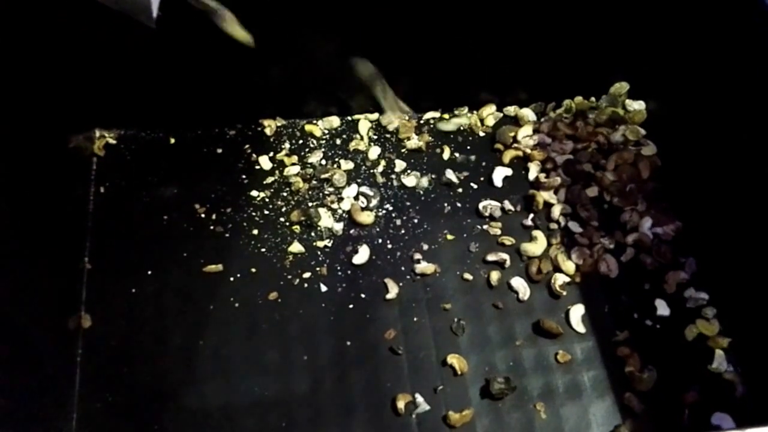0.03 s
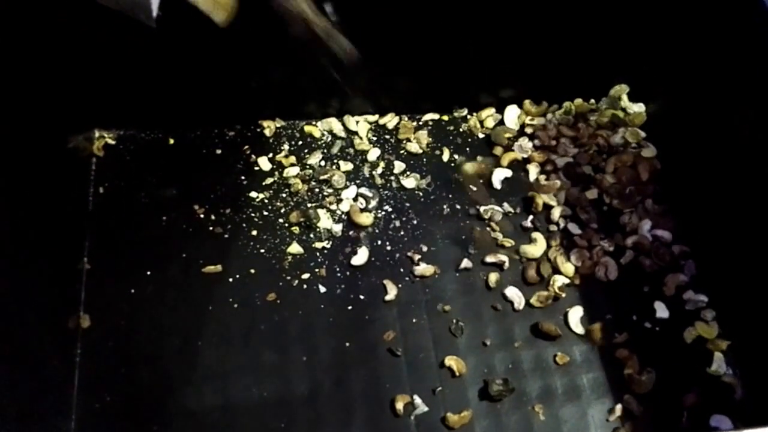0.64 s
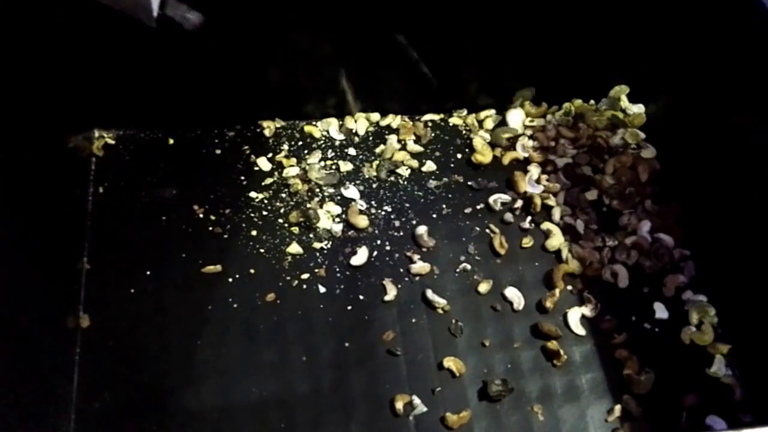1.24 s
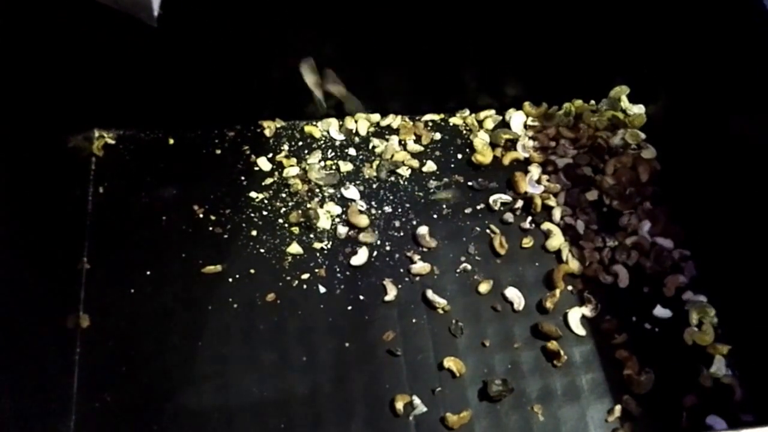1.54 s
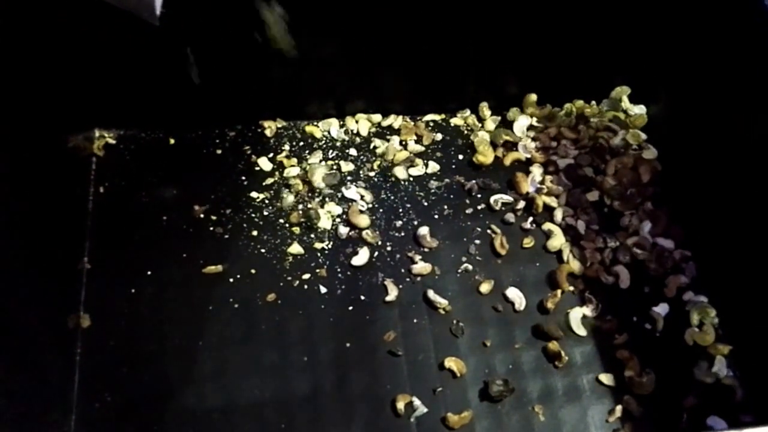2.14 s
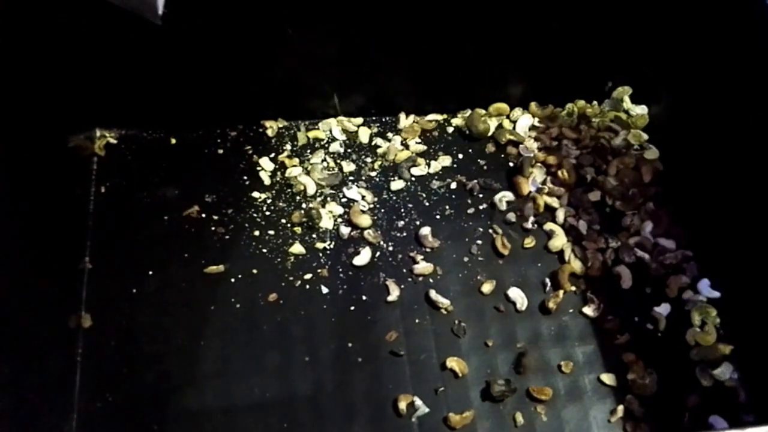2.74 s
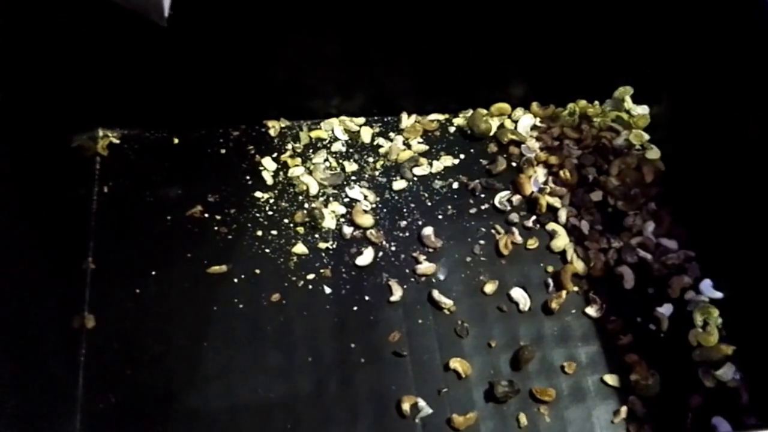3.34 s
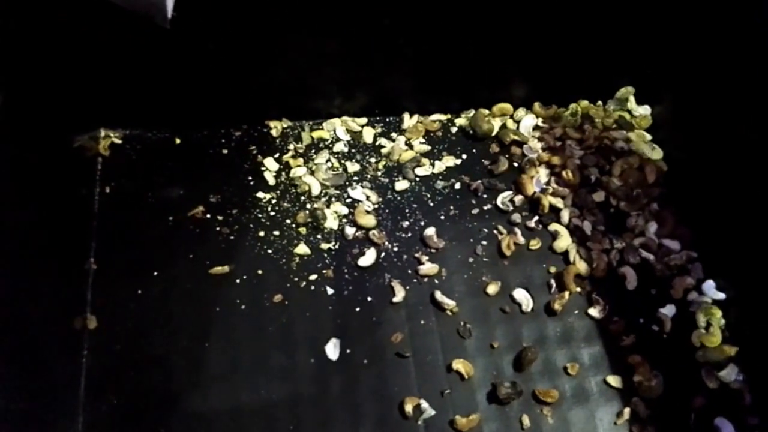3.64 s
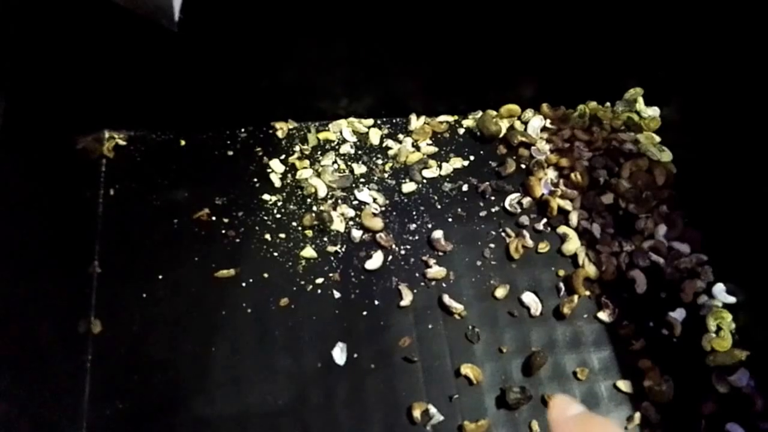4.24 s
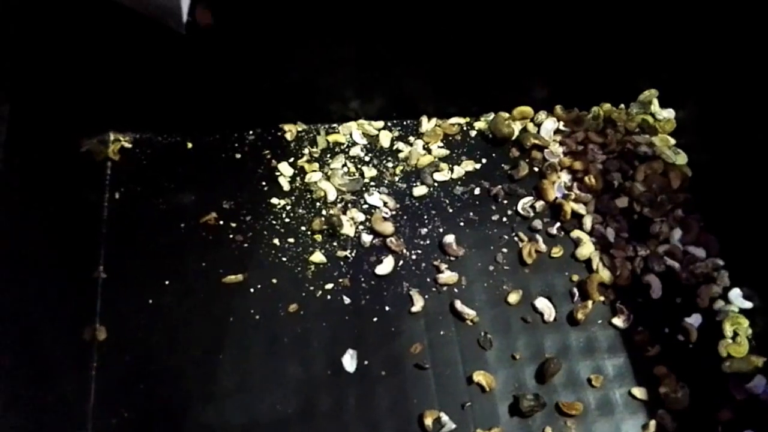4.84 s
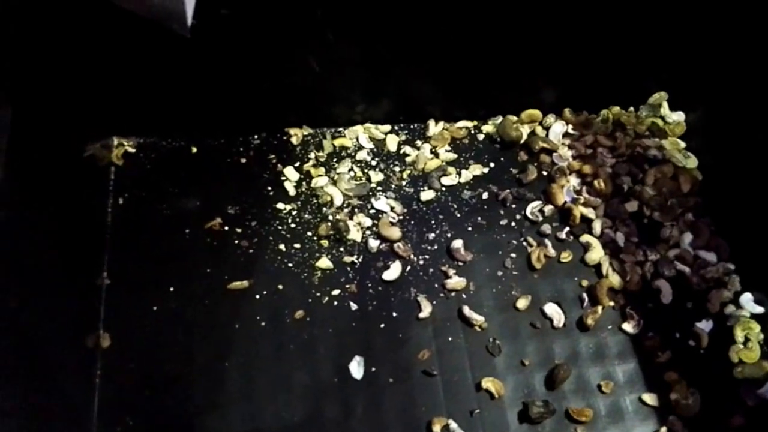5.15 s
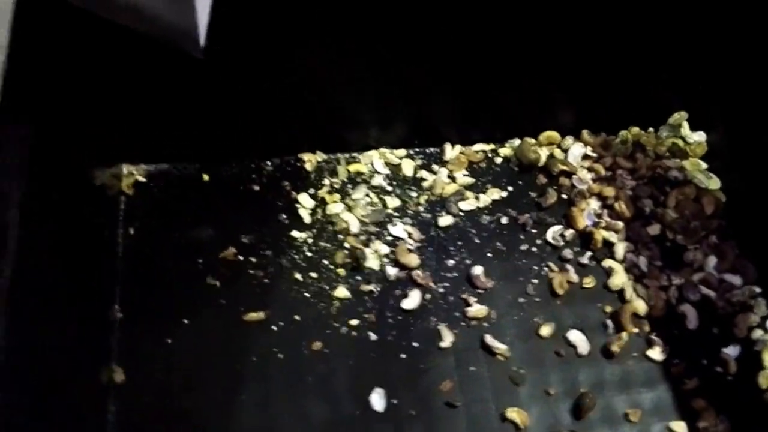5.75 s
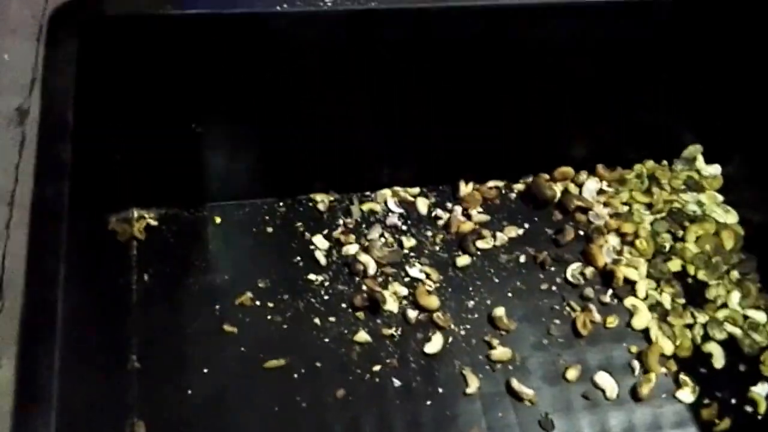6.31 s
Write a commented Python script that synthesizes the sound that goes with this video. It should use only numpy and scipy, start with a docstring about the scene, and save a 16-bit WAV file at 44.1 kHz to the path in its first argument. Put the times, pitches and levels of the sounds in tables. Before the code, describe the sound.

Close to a sorting machine in a hall, a fan rushes steadily and a feeder gives a low, pulsing drone. Over this, valves fire a dense run of sharp air jets, mixed with dry knocks of falling nuts, ticking crumbs and soft cabinet thumps. The jets and landings grow sparser, leaving the hum, a thin whine and a small hissing, whistling leak, before three last quick spits.

```python
"""Short blasts of air spit inside a steel cabinet, thick and fast at first, then one at a time.
This is an optical sorter picking over cashews, heard from just above its reject bin. Each blast is a
valve letting out a jet of air; rejected nuts knock into the bin and crumbs patter after them.
Underneath, the vibrating feeder drones and throbs, a fan runs, a thin motor whine comes and goes,
and a small air leak hisses and whistles."""
import sys
import numpy as np
from scipy import signal
from scipy.fft import rfft, irfft
from scipy.io import wavfile
from scipy.ndimage import uniform_filter1d

SR = 44100
rng = np.random.default_rng(int(sys.argv[2]) if len(sys.argv) > 2 else 0)


def file_out(sig):
    """Save sig as 16-bit WAV at sys.argv[1]."""
    # one column per channel
    cols = np.atleast_2d(sig).T
    # limit, then scale
    lim = np.clip(cols, -1, 1)
    pcm = np.round(lim * 32767).astype(np.int16)
    wavfile.write(sys.argv[1], SR, pcm)


N = 281358
TIME = np.arange(N) / SR


def undb(db):
    """Turn decibels into a number to multiply by."""
    return 10 ** (np.asarray(db) / 20)


def curve(table):
    """Join (time_s, value) points with straight lines."""
    return np.interp(TIME, *np.transpose(table))


def unit(x):
    """Scale a signal to an average power of 1."""
    return x / np.sqrt(np.mean(x ** 2))


def sides(pan_db):
    """Left and right gains; a positive pan_db makes the left louder."""
    return unit(undb(np.array([[pan_db], [-pan_db]]) / 2))


def colour(x, points):
    """Shape a sound's bass and treble by (frequency_hz, gain_db) points."""
    hz, db = np.transpose(points)
    f = np.fft.rfftfreq(x.shape[-1], 1 / SR) + 1
    return irfft(rfft(x) * undb(np.interp(np.log(f), np.log(hz), db)), x.shape[-1])


def band(x, hz, width_hz):
    """Keep the part of a sound near one pitch."""
    return signal.lfilter(*signal.iirpeak(hz, hz / width_hz, fs=SR), x)


def noise(channels=2):
    """Separate white noise for each ear."""
    return rng.standard_normal((channels, N))


def wander(per_s):
    """A smooth random wobble, about 1 in size."""
    hold = int(SR / per_s)
    steps = np.repeat(rng.standard_normal(N // hold + 1), hold)
    return unit(uniform_filter1d(uniform_filter1d(steps, hold), hold)[:N])


def grains(per_s, spread_db):
    """Tiny hits at random moments, a few much larger than the rest."""
    size = undb(spread_db * np.minimum(rng.exponential(size=N), 4))
    return (rng.random(N) < per_s / SR) * size * rng.choice([-1, 1], N)


def add(out, start_s, sound):
    """Mix a sound in at a given time."""
    i = max(int(start_s * SR), 0)
    out[..., i:i + sound.shape[-1]] += sound[..., :max(N - i, 0)]


def from_left(x, lag_s):
    """A sound from the left reaches the right ear a little later."""
    return np.array([x, np.interp(TIME - lag_s, TIME, x)])


def diffuse(pair, spacing_m=0.31):
    """Sound from all around: low notes are alike on both sides, high ones are not."""
    size = pair.shape[-1]
    likeness = np.sinc(2 * np.fft.rfftfreq(size, 1 / SR) * spacing_m / 343)
    mid, side = irfft(rfft(pair) * np.sqrt([1 + likeness, 1 - likeness]), size)
    return np.array([mid + side, mid - side]) / np.sqrt(2)


def near_walls(x, echo_s, echo_db, build_s=0.0037):
    """The direct sound plus a blur of echoes off nearby walls, dying by 60 dB in echo_s."""
    t = TIME[:SR // 2]
    walls = diffuse(rng.standard_normal((2, len(t)))) * undb(-60 * t / echo_s)
    walls *= 1 - np.exp(-t / build_s)
    response = walls * undb(echo_db) / np.sqrt(np.sum(walls ** 2) / 2)
    response[0, 0] += 1
    response[1, 26] += 1  # the direct sound reaches the right ear later
    heard = signal.fftconvolve(np.atleast_2d(x), response, axes=1)[:, :N]
    return heard / np.sqrt(1 + undb(2 * echo_db))


# The tone colour of the fan's rushing air: frequency_hz, gain_db
FAN_COLOUR = [(15, -42), (28, -18), (45, -6.5), (110, -4), (200, -2), (330, -4), (450, -4.5), (1200, -6.5),
              (2500, -12.5), (4000, -10.5), (6000, -18), (9000, -12.5), (11500, -25), (14500, -68)]
# The hums of the motor and fan: pitch_hz, relative_level_db
MOTOR_HUMS = [(38.5, -77), (66, -75), (76.5, -63.5), (120, -58), (154, -61.5), (455, -64.5), (780, -64),
              (1384, -66)]


def fan(air_db=-40.5, hum_gain_db=-1):
    """The fan pushes a steady rush of air while its motor hums on several wavering notes."""
    out = unit(colour(diffuse(noise()), FAN_COLOUR)) * undb(air_db + wander(10)) * sides(0.5)
    for hz, db in MOTOR_HUMS:
        phase = 2 * np.pi * np.cumsum(hz * (1 + 0.0022 * wander(40.15))) / SR
        out += np.sqrt(2) * np.sin(phase) * undb(db + hum_gain_db + 2 * wander(5.9))
    return out


# How the motor's whine comes and goes: time_s, relative_level_db
WHINE_LEVELS = [(0, -44), (3.5, -50), (3.7, -56), (4.1, -50), (4.7, -58), (4.87, -53), (5.6, -45.5),
                (5.85, -56), (6.25, -52.5), (6.38, -55)]


def motor_whine(pitch_hz=3654, gain_db=-1, low_note_db=-60):
    """A motor gives a thin, unsteady whine over a steadier note an octave below."""
    phase = 2 * np.pi * np.cumsum(pitch_hz + 16 * wander(90)) / SR
    high_note = np.sin(phase) * undb(curve(WHINE_LEVELS) + gain_db)
    low_note = np.sin(phase / 2) * undb(low_note_db)
    return from_left(np.sqrt(2) * (high_note + low_note), lag_s=0.00009)


# The tone colour of escaping air: frequency_hz, gain_db
HISS_COLOUR = [(3500, -16.5), (5000, -6.5), (6500, -3), (8000, 0), (9300, 2.5), (10300, -2.5),
               (11500, -9.5), (13800, -16.5), (15000, -68)]


def air_hiss(source):
    """Turn noise into the bright hiss of escaping air, for the leak and the blasts."""
    return unit(colour(source, HISS_COLOUR))


# How strongly the leak hisses: time_s, relative_level_db
LEAK_LEVELS = [(0, -30.5), (2.8, -39.5), (3.5, -43), (4.4, -39.5), (5.3, -46.5), (5.55, -37.5), (5.72, -39),
               (5.88, -45), (6.38, -44)]
# The leak's whistles: loudest_at_s, pitch_hz, relative_level_db, fade_s
LEAK_WHISTLES = [(0.9, 7400, -30, 0.12), (3.86, 7360, -41, 0.023), (3.91, 7340, -39, 0.057),
                 (4.035, 7300, -44, 0.025), (4.775, 7520, -34, 0.02), (4.84, 7505, -42, 0.027),
                 (4.94, 7515, -40, 0.061), (5.09, 7490, -44, 0.05), (5.25, 7500, -52, 0.03)]


def air_leak(gain_db=-2, rise_s=0.017):
    """Compressed air seeps past a valve and now and then catches a thin, flickering whistle."""
    out = air_hiss(noise()) * undb(curve(LEAK_LEVELS) + gain_db + 1.5 * wander(25))
    waver_hz = 60 * wander(500)
    flicker_db = 2.5 * wander(120)
    for loudest_at_s, hz, db, fade_s in LEAK_WHISTLES:
        swell = np.exp(-np.maximum((loudest_at_s - TIME) / rise_s, (TIME - loudest_at_s) / fade_s))
        tone = np.sqrt(2) * np.sin(2 * np.pi * np.cumsum(hz + waver_hz) / SR)
        out += from_left(tone * swell * undb(db + gain_db + flicker_db), lag_s=0.00003)
    return out


# The feeder's throbs: loudest_at_s, relative_level_db, pitch_hz
FEEDER_THROBS = [(0.01, -27.5, 246), (0.1, -40, 246.7), (0.32, -34.5, 230.5), (0.43, -40, 220.7),
                 (0.54, -37, 225.4), (0.647, -31, 251.6), (0.78, -33.5, 247), (0.873, -38.5, 254.5),
                 (0.978, -36, 238.6), (1.078, -32, 254.2), (1.281, -34.5, 241.7), (1.474, -35.5, 253),
                 (1.731, -32, 252.6), (1.82, -37.5, 250.5), (2.03, -34, 236), (2.143, -35, 260.5),
                 (2.26, -37, 220.5), (2.374, -33.5, 254.4), (2.476, -52, 245.4), (2.57, -39, 255.2),
                 (2.81, -37, 256), (2.912, -38.5, 251.1), (3.08, -35.5, 227.9), (3.18, -40, 244),
                 (3.258, -37.5, 226), (3.47, -32.5, 255), (3.56, -37, 248), (3.662, -35, 254),
                 (3.884, -34, 261), (4.101, -31, 246.7), (4.295, -34.5, 260), (4.54, -29.5, 257),
                 (4.723, -33, 255), (4.94, -41, 262.5), (5.176, -33.5, 257.7), (5.385, -36.5, 255),
                 (5.6, -42, 264), (5.82, -32, 251), (5.965, -36, 232.6), (6.045, -36.5, 255.2),
                 (6.27, -35.5, 258.5)]


def feeder(drone_hz=247, drone_db=-50.5, throb_gain_db=-3, throb_width_s=0.03764,
           tray_hz=223, tray_db=-52, tray_late_s=0.079, scatter_db=-52):
    """The vibrating feeder drones on a low note that bends with each throb; its tray rumbles after."""
    loudest_at_s, throb_db, throb_hz = np.transpose(FEEDER_THROBS)
    throbs = np.array([np.exp(-((TIME - s) / throb_width_s) ** 2) for s in loudest_at_s])
    swell = undb(throb_db + throb_gain_db) @ throbs
    hz = drone_hz + (throb_hz - drone_hz) @ throbs + 4 * wander(40)
    strength = np.hypot(swell, undb(drone_db + 4 * wander(17)))
    shudder = undb(2 * wander(70))
    drone = np.sin(2 * np.pi * np.cumsum(hz) / SR) * strength * shudder
    late_throbs = np.interp(TIME - tray_late_s, TIME, throbs.sum(axis=0))
    rumble_db = tray_db + 7 * late_throbs + 2 * wander(30)
    tray = np.sin(2 * np.pi * np.cumsum(tray_hz + 9 * wander(50)) / SR) * undb(rumble_db)
    scattered = unit(band(band(diffuse(noise()), 228, 140), 228, 140)) * undb(scatter_db)
    return from_left(np.sqrt(2) * (drone + tray), lag_s=0.00036) + scattered


def hall_echo(sound, echo_s=1, level_db=-48):
    """The hall sends back a faint echo from all around."""
    tail = diffuse(noise()[:, :SR]) * undb(-60 * TIME[:SR] / echo_s)
    return unit(signal.fftconvolve(sound, tail, axes=1)[:, :N]) * undb(level_db)


# Low thumps of the cabinet wall: start_s, level_db, pitch_hz
WALL_THUMPS = [(0.276, -39, 125), (0.399, -33, 132.3), (0.825, -36, 130), (0.955, -37, 116),
               (1.364, -35.5, 135), (1.5, -47, 125.8), (2.16, -39.5, 124.5), (3.195, -39, 115),
               (3.432, -39, 117.2), (4.12, -40, 115), (5.985, -41, 135), (6.045, -42, 129.3)]


def wall_thumps(swell_s=0.011):
    """Under the heavier runs of blasts, the cabinet wall bulges and swings a few times."""
    out, t = np.zeros((2, N)), TIME[:SR // 6]
    swell = t / swell_s * np.exp(1 - t / swell_s)
    for start_s, db, hz in WALL_THUMPS:
        add(out, start_s, undb(db) * np.sin(2 * np.pi * hz * t) * swell)
    return out


# The tone colour of falling crumbs: frequency_hz, gain_db
PATTER_COLOUR = [(100, -73), (350, -4.5), (480, -35), (650, -1.5), (1250, -10.5), (2000, -2.5), (3200, -5),
                 (6000, -11), (9000, -17), (11500, -43), (15000, -46)]


def crumbs(blows, scatter_db=-10.5, settle_s=0.089, trickle_db=-47.5):
    """Blasts and knocks scatter broken pieces down the chute; the patter then settles to a trickle."""
    keep = np.exp(-1 / (settle_s * SR))
    recent_power = signal.lfilter([1 - keep], [1, -keep], np.mean(blows ** 2, axis=0))
    flow = np.hypot(np.sqrt(recent_power) * undb(scatter_db), undb(trickle_db))
    ticks = near_walls(grains(per_s=520, spread_db=4), echo_s=0.045, echo_db=5)
    return unit(colour(ticks, PATTER_COLOUR)) * flow * sides(6)


# Nuts hitting other nuts: start_s, relative_level_db, pitch_hz
NUT_SNAPS = [(0.465, 5, 5540), (0.713, -12, 6500), (0.859, -8, 7600), (1.17, -9, 8010), (2.262, -5.5, 7010),
             (2.484, -7.5, 7710), (2.69, -8.5, 9220), (2.701, -4, 5400), (3.3062, -17, 6020)]


def nut_snaps(fade_s=0.00045, gain_db=3):
    """One nut strikes another with a brief, bright snap."""
    out, t = np.zeros((2, N)), TIME[:SR // 20]
    for start_s, db, hz in NUT_SNAPS:
        snap = band(rng.standard_normal(len(t)) * np.exp(-t / fade_s), hz, width_hz=6000)
        add(out, start_s, undb(db + gain_db) * sides(3) * snap)
    return near_walls(out, echo_s=0.024, echo_db=0)


# The tone colour of the bin's short ring: multiple_of_pitch, gain_db
BIN_RING = [(.1, -24), (.25, 4), (.5, -3.5), (1, 4), (2.2, -9), (3.2, -11), (6, -45)]
# The tone colour the bin gives every landing: frequency_hz, gain_db
LANDING_COLOUR = [(100, -7.5), (500, -10.5), (1250, 6.5), (1700, 3.5), (3000, 4.5), (9000, -17.5),
                  (12000, -24.5), (15000, -52)]
# Whole nuts landing: start_s, relative_level_db, pitch_hz, thud_gain_db, crack_gain_db, pan_db
NUT_LANDINGS = [(0.127, -14, 1360, -24, -14, 6), (0.464, -6.5, 2070, -19, 0.5, 18),
                (0.484, -9, 1390, -26, -1, 7), (0.618, -12.5, 2090, -15, 0, 12),
                (0.694, -11.5, 1320, -13, -3, 4), (0.7128, -4.5, 2480, -5.5, 0.5, 13),
                (0.716, -4, 1140, -18, -12, 4), (0.776, -8, 1110, -10, -5, 7.5),
                (0.8299, -3.5, 1380, -18, 5.5, 10.5), (0.834, -10, 1450, -14, -2, 7),
                (0.876, -10.5, 970, -11, -4, 10), (0.96, -10.5, 1320, -11, -3, 9),
                (1.056, -14.5, 1520, -41, -20, 2), (1.108, -11.5, 1305, -14, -23, 6),
                (1.116, -13, 2117, -33, -4, 4), (1.129, -11.5, 1280, -7, -20, 5),
                (1.258, -13.5, 1316, -42, 6, 2), (1.265, -6.5, 1270, -12, -14, 7),
                (1.3215, -7, 2100, -20, -19, 14), (1.84, -11, 1680, -28, -12, 16),
                (1.852, -7.5, 1700, -37, -12, 10), (1.979, -6, 1190, -4.5, 3, 11),
                (1.984, -10, 1960, -0.5, -3, 11), (2.228, -12, 2071, -12, -14, 11),
                (2.2621, -6.5, 1140, -17, -1.5, 5), (2.267, -13, 1050, -12, -3, 7),
                (2.372, -20.5, 1850, -31, 5.5, 4), (2.378, 1, 1280, -20, -16, 2.5),
                (2.485, -12.5, 1500, -13, -24, 3), (2.524, -14, 640, -4.5, -36, 9),
                (2.541, -17.5, 1320, -6, -10, 7), (2.5712, -11.5, 2210, -22, -3, 13),
                (2.577, -18, 1250, -14, 3, 6), (2.6094, -13, 1580, -27, 0, 4),
                (2.616, -23, 1400, -12, -2, 9), (2.645, -21, 1530, -15, 1, 8),
                (2.756, -10.5, 1320, -12, -11, 9), (3.563, -16.5, 1467, -11, -4, 6),
                (3.617, -23.5, 1270, -14, -9, 5), (4.141, -40, 1260, -5, 1, 8),
                (4.549, -20, 860, -8, -3, 8), (5.961, -25, 1787, -5, -3, 10),
                (6.06, -24.5, 1193, 0.5, -16, 5)]


def nut_landings(knock_cycles=1.52, thud_hz=680, thud_s=0.0041, crack_hz=3400, crack_s=0.0017,
                 clack_s=0.0016, ring_s=0.004, contact_s=0.0002, gain_db=-0.5, bounce_db=-13):
    """A nut cracks and knocks on the bin floor, bends it with a thud and tips onto its other end."""
    out, t = np.zeros((2, N)), TIME[:SR // 20]
    # each nut gets its own bounce delay, and a landing spot that retunes the thud and ring
    chances = rng.uniform([.003, .72], [.007, 1.25], (len(NUT_LANDINGS), 2))
    for (start_s, db, hz, thud_db, crack_db, pan_db), (bounce_s, spot) in zip(NUT_LANDINGS, chances):
        ring_noise, crack_noise = rng.standard_normal((2, 2, len(t)))
        knock = undb(-3.5) * np.sin(2 * np.pi * hz * t) * np.exp(-t * hz / knock_cycles)
        clack_hz = hz * rng.uniform(1.4, 2.4)  # the nut's own dry note
        clack = undb(-12) * np.sin(2 * np.pi * clack_hz * t) * np.exp(-t / clack_s)
        thud = undb(thud_db + 4) * np.sin(2 * np.pi * thud_hz * spot * t) * np.exp(-t / thud_s)
        fade_s = ring_s * 2 ** ((db + 7) / 15)  # 15 dB harder rings twice as long
        ring = unit(colour(diffuse(ring_noise), np.array(BIN_RING) * [hz * spot, 1]))
        ring *= undb(-12) * np.exp(-t / fade_s)
        crack = unit(band(band(crack_noise, crack_hz, 2900), crack_hz, 2900))
        crack *= undb(crack_db - 6) * np.exp(-t / crack_s)
        force = 1 - np.exp(-t / contact_s)  # a nut is soft, so its push builds up
        landing = (knock + clack + thud + ring + crack) * force * undb(db + gain_db) * sides(pan_db)
        add(out, start_s, landing)
        add(out, start_s + bounce_s, undb(bounce_db) * landing)
    return colour(near_walls(out, echo_s=0.048, echo_db=-8.5), LANDING_COLOUR)


def valve_chatter(blasts, clump_ms=19, chatter_ms=6, gain_db=-3.5, body_db=2):
    """Extra blast rows: a clump of nuts that holds one valve open briefly trips its neighbour too."""
    clumps = [row for row in blasts if row[1] > clump_ms]
    chances = rng.uniform([.4, -1], [1.3, 1], (len(clumps), 2))
    return [(start_s + late * open_ms / 1000, chatter_ms, db + gain_db + scatter_db, body_db, 0)
            for (start_s, open_ms, db, _, _), (late, scatter_db) in zip(clumps, chances)]


# The tone colour of the cabinet's low answer to a blast: frequency_hz, gain_db
CABINET_COLOUR = [(35, -28), (70, -22), (125, 5.5), (180, -22), (330, 0.5), (600, -7), (1500, -32)]
# The tone colour of a jet's rush, below its hiss: frequency_hz, gain_db
RUSH_COLOUR = [(1200, -25), (2300, -14), (3300, 5.5), (5200, 5), (7000, -15), (9500, -48)]
# The tone colour of nuts flung against the chute: frequency_hz, gain_db
CLATTER_COLOUR = [(60, -35), (130, -16), (330, -0.5), (480, -4.5), (700, 2.5), (1300, 4.5), (2000, 2),
                  (2800, 4.5), (5000, -42)]
# Valves firing: start_s, open_ms, relative_level_db, body_db (rush and clatter), sizzle_db (top treble)
VALVE_BLASTS = [(0.0, 6.8, -13, 0, 2), (0.02, 30.4, -22.5, -2, 1.0), (0.1, 18.2, -22.5, 3.5, -4),
                (0.121, 23.6, -20, 0.5, -11), (0.178, 17.8, -22.5, 2.5, -3), (0.225, 12.6, -16, 0, 2.5),
                (0.249, 34, -23.5, 0, -1), (0.281, 41, -25, -2, 1.5), (0.347, 12, -16.5, -4, 2),
                (0.382, 25, -24.5, -4.5, 4), (0.408, 22.5, -19, -9.5, -1.5), (0.48, 25.8, -21, 0.5, -5),
                (0.524, 19.6, -25, -4, -3), (0.571, 38, -22.5, -5, 2), (0.641, 9.8, -14, -6, -4),
                (0.678, 21, -28, -1, -2), (0.766, 13, -32, 3, -9), (0.793, 6.5, -22, -1.5, -8),
                (0.813, 18, -23, -5, 0.5), (0.83, 18.3, -21, -6, 1.5), (0.932, 56, -23.5, -6, 0),
                (1.029, 21.7, -23.5, -10, 4), (1.07, 53, -29, -1.5, 0.0), (1.18, 20, -29.5, -15, -1),
                (1.223, 12, -21.5, -5.5, 1), (1.236, 7, -18.5, -1.5, 4.5), (1.283, 63, -30.5, -7, -0.5),
                (1.347, 13, -23, -4, 3.5), (1.374, 34, -22, -11, -1), (1.454, 18, -21, -3, 0),
                (1.493, 32, -23, -7.5, -4), (1.595, 10.9, -29, -3, -1), (1.61, 14.1, -21, -3.5, 1.5),
                (1.676, 11.8, -20.5, -5, -0.5), (1.697, 34.5, -19, -8, 1), (1.778, 6.2, -23.5, 1.5, -7),
                (1.807, 25, -29, 1, 1.5), (1.843, 26.7, -25, 4.5, -2), (1.865, 12.5, -20, -4.5, 4),
                (1.905, 12.7, -18.5, -1.5, 2), (1.943, 17.4, -19, -5.5, -5), (1.971, 20.2, -19.5, -0.5, 1),
                (2.008, 40, -23.5, -2.5, 0), (2.067, 13.5, -21, -6, -1), (2.122, 41.6, -20.5, -5.5, -0.5),
                (2.173, 12.3, -18.5, -2, -8), (2.202, 8.8, -15, -5.5, -1.5), (2.275, 8.2, -20, -5, 6.5),
                (2.331, 16.8, -26.5, -17, 2), (2.383, 7.6, -20.5, -28, 2.5), (2.814, 12.54, -31, -4.5, 1.5),
                (2.993, 16.5, -19.5, -7.5, 0.5), (3.05, 15.5, -34.5, 5, -2), (3.069, 9.4, -21, -5.5, -1),
                (3.172, 12, -28.5, -7, -41), (3.199, 10.3, -22.5, -6, 0), (3.247, 9.5, -21.5, -10, -1.5),
                (3.306, 5.8, -13, -11, -9.5), (3.365, 17.4, -35.5, -15, -1), (3.396, 5.4, -31, -21, -1),
                (3.438, 9.5, -23, -9.5, 0), (3.471, 6.6, -24, -10.5, 1.5), (3.803, 4.2, -31.5, -3, -3.0),
                (3.953, 7.8, -25.5, -6.5, -1.5), (4.086, 13.7, -22.5, -10, 0), (4.137, 7.1, -19, -9, -5),
                (4.166, 9.1, -23, -10, -1), (4.21, 17, -25, -9, 0.5), (4.26, 7.2, -22.5, -21, 2),
                (4.396, 9, -24, -4, -1), (4.422, 10, -24.5, -15, -2), (4.546, 5.1, -22, -10, 3.5),
                (5.959, 7, -23, -6.5, -3.5), (6.008, 8.9, -24, -7, -5), (6.057, 8.1, -21, -15, -2.5)]


def air_blasts(rush_db=-3.5, clatter_db=-4.5, cabinet_db=-24, tray_db=-19, grit_db=-5, flutter_db=2,
               valve_move_s=0.001, spit_s=0.0018, reflection=0.4, nozzle_count=5):
    """Each valve lets out a burst of churning air that flings nuts at the chute; the cabinet rings."""
    dusty_air = noise() + undb(grit_db) * unit(grains(per_s=900, spread_db=2.2))
    hiss = unit(air_hiss(dusty_air) * undb(flutter_db * wander(400))) * sides(0.081)
    sizzle = signal.sosfiltfilt(signal.butter(4, 9000, "high", fs=SR, output="sos"), hiss)
    cabinet = unit(colour(noise(channels=1), CABINET_COLOUR)) * undb(cabinet_db)
    tray = unit(band(band(noise(channels=1), 238.6, 50), 238.6, 50)) * undb(tray_db)
    boom = cabinet + tray  # the air shakes both
    rush = unit(colour(noise() + grains(per_s=770, spread_db=2.4), RUSH_COLOUR))
    rush *= undb(rush_db + flutter_db * wander(400)) * sides(2)
    clatter = unit(colour(grains(per_s=2500, spread_db=3.65), CLATTER_COLOUR))
    clatter = clatter * undb(clatter_db) * sides(4)
    nozzles = np.zeros((nozzle_count, 2, N))
    blasts = VALVE_BLASTS + valve_chatter(VALVE_BLASTS)
    for k, (start_s, open_ms, db, body_db, sizzle_db) in enumerate(blasts):
        first, open_s = int(start_s * SR), open_ms / 1000
        span = slice(first, min(first + int((open_s + valve_move_s) * SR), N))
        t = TIME[span] - TIME[first]
        valve = np.clip(t / valve_move_s, 0, 1) * np.clip((open_s - t) / valve_move_s + 1, 0, 1)
        valve *= 1 + 0.9 * np.exp(-t / spit_s)  # stored pressure escapes first
        nuts = undb(2 * np.log2(open_ms / 19.7))  # twice as long flings 2 dB more clatter
        jet = (hiss[:, span] + (undb(sizzle_db) - 1) * sizzle[:, span]) / np.std(hiss[:, span])
        body = undb(body_db) * (rush[:, span] + nuts * clatter[:, span])
        blast = undb(db) * sides(2) * valve * (jet + boom[:, span] + body) / np.hypot(1, reflection)
        nozzle = nozzles[k % nozzle_count]
        add(nozzle, start_s, blast)
        add(nozzle, start_s + rng.uniform(0.0003, 0.0016), reflection * blast)  # off the chute wall
    # each nozzle's sound takes its own path through the open cabinet, which gives out little deep bass
    heard = sum(near_walls(nozzle, echo_s=0.13, echo_db=2.5) for nozzle in nozzles)
    return signal.sosfilt(signal.butter(3, 105, "high", fs=SR, output="sos"), heard)


def scene():
    """Blasts and falling nuts, with a faint echo of the hall, over the running machine."""
    blasts, knocks = air_blasts(), nut_landings()
    blows = blasts + undb(-4) * knocks  # a knock scatters fewer crumbs than a blast
    sorting = blasts + knocks + nut_snaps() + crumbs(blows)
    return sorting + hall_echo(sorting) + wall_thumps() + feeder() + fan() + motor_whine() + air_leak()


def record(dry):
    """Round off the loudest peaks and cut the highest treble."""
    ceiling, top_hz = 0.92, 14400
    rounded = ceiling * np.tanh(dry / ceiling)
    return signal.sosfilt(signal.ellip(8, .2, 70, top_hz, fs=SR, output="sos"), rounded)


dry = scene()
out = record(dry)
file_out(out)
```